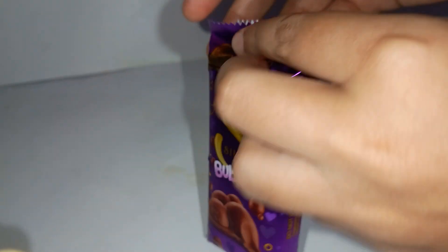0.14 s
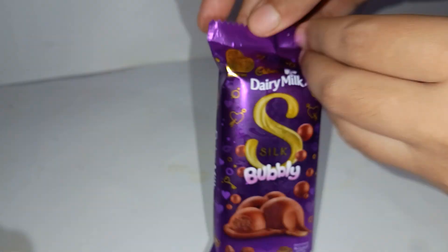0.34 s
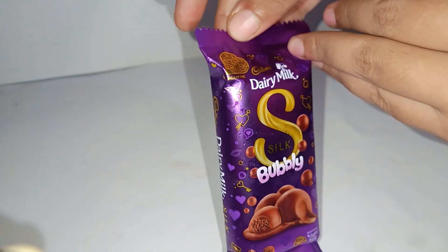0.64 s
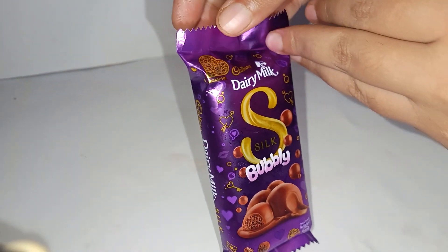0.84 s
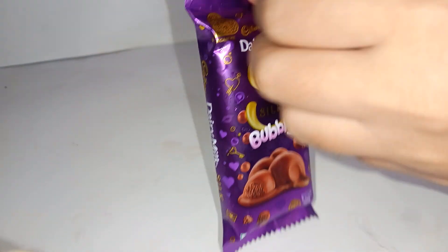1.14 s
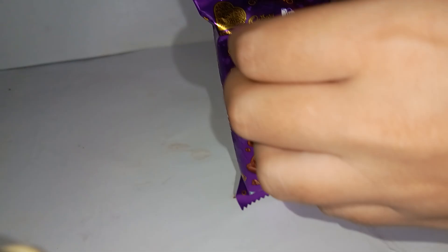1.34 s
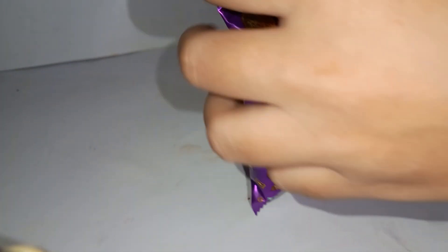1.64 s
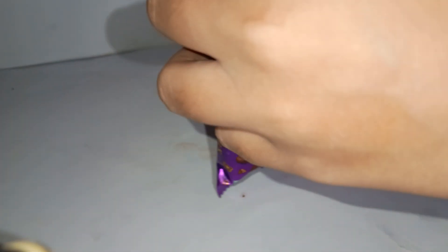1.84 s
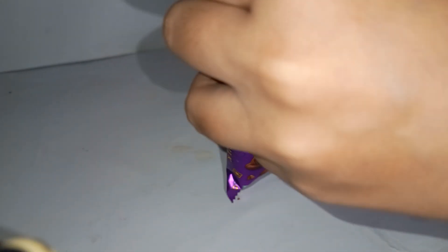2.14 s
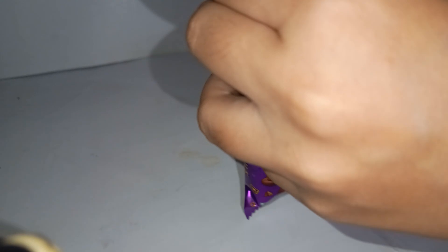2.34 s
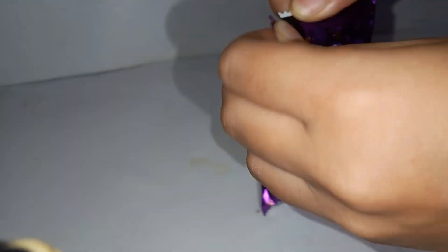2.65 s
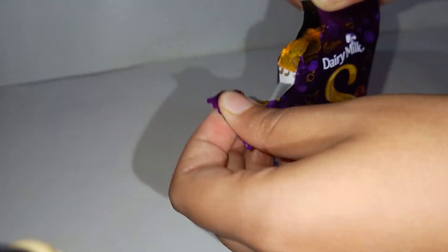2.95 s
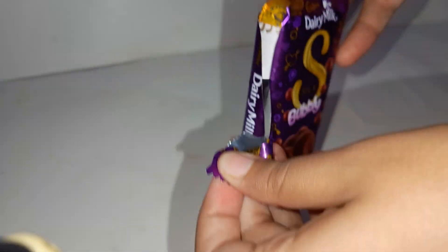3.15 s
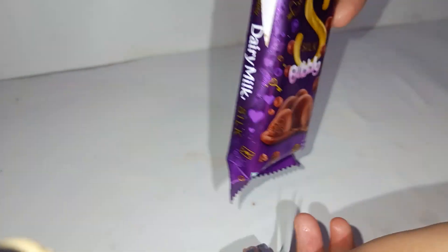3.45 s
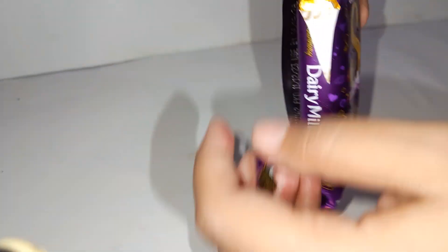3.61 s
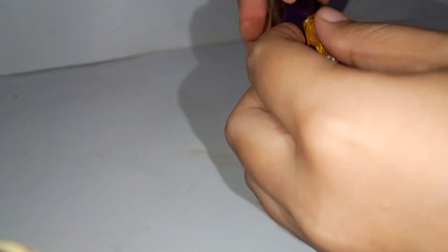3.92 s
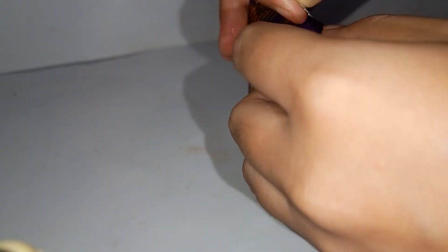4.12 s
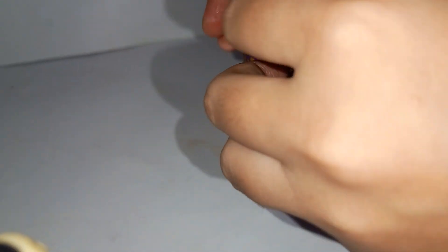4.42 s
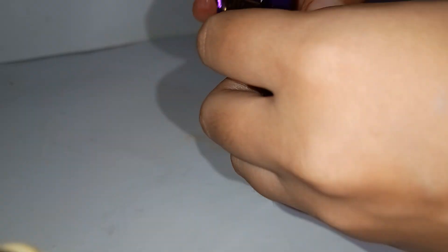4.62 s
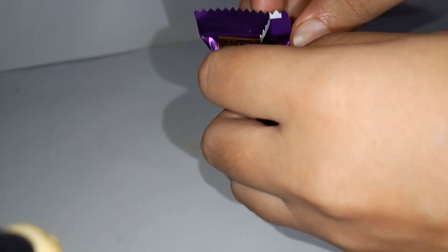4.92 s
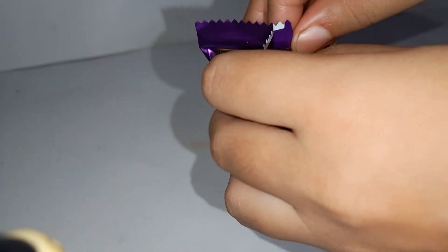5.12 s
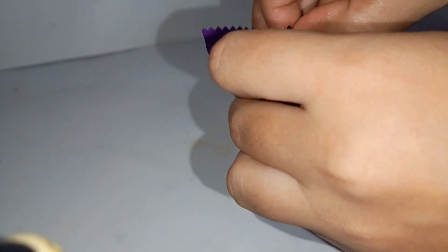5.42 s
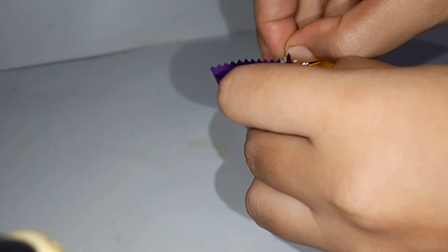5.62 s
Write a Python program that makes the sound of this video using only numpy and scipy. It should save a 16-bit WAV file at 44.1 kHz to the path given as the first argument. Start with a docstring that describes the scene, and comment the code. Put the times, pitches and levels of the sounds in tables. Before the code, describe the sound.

Very close stereo sound of hands opening a chocolate bar wrapped in plastic and foil on a table, in a small room with short dull echoes. A crackling burst with rustle comes at 0.15-0.5 s, with soft bumps near 0.2 s and a hard snap at 0.45 s. After a quieter gap, sharp cracks fall around 1.0 and 1.3 s, then dull knocks at 1.4-1.5 s. From about 2.1 to 2.9 s the tearing is dense: many dry snaps in quick clusters, with a swelling rustle near 2.8 s. It thins out from 3.2 to 4 s into small ticks and light strokes, with a bright crack at 4.1 s. Crackling and faint bumps return at 4.5-4.85 s, a strong snap leaning left at 5.1 s, and a loud crisp rustle with snaps from 5.5 s to the end. Underneath lie a low wavering drone that briefly dips, soft rumble and faint steady hiss.

```python
"""At a table in a room, hands turn and tear a plastic and foil sweet wrapper close to a pair of microphone ports.
Creases of the film snap over: a sharp crack, then dying noise coloured by a ring; echoes of table and walls follow.
Sliding fingers rustle: random grains and friction noise through the resonances of the film.
The bar and knuckles bump the table, heard as its dull decaying modes.
Behind it lie a wavering drone, rumble through the room's modes and steady air hiss."""
import sys
import numpy as np
from scipy import signal
from scipy.fft import rfft, irfft
from scipy.io import wavfile

SR = 44100
rng = np.random.default_rng(int(sys.argv[2]) if len(sys.argv) > 2 else 0)


def dump(signal):
    """Clip the signal to [-1, 1] and save it as 16-bit WAV at the path in sys.argv[1]."""
    limited = np.clip(np.atleast_2d(signal).T, -1, 1)
    pcm = np.round(limited * 32767).astype(np.int16)
    wavfile.write(sys.argv[1], SR, pcm)


N = 254456  # samples


def from_db(db):
    """Decibels to an amplitude factor."""
    return 10 ** (np.asarray(db) / 20)


def rms_one(x):
    """Scale to an rms of 1, both ports together."""
    return x / np.sqrt(np.mean(x ** 2) + 1e-20)


def in_time(rows):
    """Join the rows by straight lines: one curve per column after the time."""
    time_s, *columns = np.transpose(rows)
    return [np.interp(np.arange(N) / SR, time_s, column) for column in columns]


def band(x, low_hz, high_hz):
    """Keep one band, with gentle edges."""
    return signal.sosfilt(signal.butter(2, [low_hz, high_hz], "band", fs=SR, output="sos"), x)


def resonance(x, hz, width_hz):
    """Two poles, gain about 1 on top."""
    r = np.exp(-np.pi * width_hz / SR)
    feedback = [1, -2 * r * np.cos(2 * np.pi * hz / SR), r * r]
    return signal.lfilter((1 - r * r) / 2 * np.array([1, 0, -1]), feedback, x)


def drift(rate_hz):
    """Slow random wander with an rms of 1."""
    r = np.exp(-2 * np.pi * rate_hz / SR)
    wander = signal.lfilter([1], [1, -2 * r, r * r], rng.standard_normal(N + SR))
    return rms_one(wander[SR:])


RIGHT_LAG = 7  # samples


def pair(noise, alike):
    """Left and right from two unrelated signals; the right port hears the shared part later."""
    alike = np.clip(alike, 0, 1)
    late = np.roll(noise[0], RIGHT_LAG)
    return np.array([noise[0], np.sqrt(alike) * late + np.sqrt(1 - alike) * noise[1]])


def treble_of(x, tilt_db):
    """The lower and upper treble, tipped against each other."""
    lower = band(band(x, 7650, 11200), 5200, 12000)
    upper = band(band(x, 11200, 22000), 12000, 16000)
    return (rms_one(lower) + from_db(tilt_db) * rms_one(upper)) / np.sqrt(1 + from_db(2 * tilt_db))


# creases snapping over: start_s, body_db, ring_hz, low_db (re body), treble_db (re body), pan_db (left re right)
SNAPS = [(0.1447, -27, 3700, -11.5, -6.5, 4), (0.224, -41, 4370, -21, -10, -1),
         (0.27, -38, 3500, -26, -7, 3), (0.351, -41, 2480, -12, -13, 6), (0.3651, -39.5, 6200, -14, -21, 2),
         (0.4451, -28, 5700, -48, -10.5, 19), (0.4503, -22, 4970, -17.5, -8, -2),
         (0.456, -25.5, 3960, -21, -9, 12.5), (0.4998, -51, 1570, -4, -19, 5),
         (0.5357, -38, 2940, -2, -24.5, 1), (0.8998, -43, 3880, -7.5, -11, 6.5),
         (0.9217, -41, 4675, -9, -6.5, 1), (0.9831, -36.5, 3837, -16, -4, 3),
         (1.0043, -24.5, 3660, -3.5, -3, 3.5), (1.0488, -42.5, 6750, -7, -3, 2.5),
         (1.2698, -28.5, 5440, -10.5, -11, 1), (1.287, -28, 6620, -27, -10, 2.5),
         (1.2994, -31, 3800, -15, -12, 3), (1.3247, -24.5, 7800, -15.5, 1.5, 1),
         (1.5054, -39.5, 1770, -4.5, -17, -3), (1.571, -40.5, 5288, -14, -19, -1),
         (1.6007, -34.5, 3570, -15, -10, 5), (1.641, -61, 4000, -8, 6.5, -4),
         (1.7524, -35, 1880, -18, -51, 4), (1.8116, -53, 2670, 0.5, -18, 7), (1.864, -56, 7184, -28, 12, 0),
         (1.9054, -32, 2330, -20.5, -10, 4.5), (2.08, -26, 2080, -18.5, -36, 0),
         (2.085, -26.5, 2130, -20, -7, 6.5), (2.096, -47, 2500, -21, -4, -10),
         (2.1579, -32, 4440, -21.5, -14, 1), (2.1858, -24, 3110, -20.5, -7.5, 1.5),
         (2.198, -30.5, 4736, -26, -18, -2), (2.213, -30, 2980, -21, 4, 3),
         (2.254, -25, 7060, -23.5, -9.5, -1.5), (2.266, -51, 4470, -12, -7, 2),
         (2.3134, -32.5, 2340, -8, -11, 3), (2.339, -33.5, 2100, -14.5, -4, -2),
         (2.4013, -35, 3830, -43, -7, 2.5), (2.4515, -35, 6250, -43, 9, -1),
         (2.4928, -41.5, 4130, -24, -30, 1), (2.5489, -62, 2095, -30, 9, 1),
         (2.5697, -30.5, 2960, -38, -37, 6), (2.6081, -26.5, 2920, -40, -6, 5),
         (2.671, -30, 3550, -12.5, -8, 10), (2.6835, -26.5, 6100, -28, 1, -1),
         (2.7243, -26.5, 3680, -25, -8, 1), (2.7744, -30, 6200, -47, -2, -3),
         (2.78, -40, 3980, -33, 3.5, 5), (2.7916, -40, 3330, -26, -35, 11),
         (2.8088, -35, 1806, -10.5, -20, 0), (2.831, -30, 4200, -19, -5, 0),
         (2.8364, -28, 5700, -17, -8, 3), (2.854, -27, 3470, -22, -11, 1),
         (2.857, -25.5, 3240, -36, -28, 10.5), (2.8632, -31.5, 3900, -27, -4, 0),
         (2.9571, -36, 4290, -22.5, -0.5, 3.5), (3.019, -45, 4030, -29, -30, 4),
         (3.096, -30, 3265, -7.5, -8, 4.5), (3.1896, -45, 3622, -17, -26.5, 6),
         (3.3092, -35, 3920, -5.5, -8, -0.5), (3.3537, -48, 3180, -7, -7, 7.5),
         (3.542, -60, 6500, -25, -1.5, 1.5), (3.6086, -38, 4370, -39.5, -25, 7.5),
         (3.64, -59, 2663, -16, 4.5, 13), (3.6715, -46, 3770, -41, -7.5, 9.5),
         (3.7012, -42.5, 4335, -46, -9, 4), (3.7965, -43, 3380, -26, -8, 2), (3.873, -35, 6590, -13, -6, 3),
         (3.8745, -33, 3511, -11.5, -7, 2.5), (3.9145, -43.5, 6400, -28, 1, -2),
         (4.045, -57, 4670, -6, 10, 7), (4.078, -47.5, 2910, -26, -23, -2),
         (4.111, -28.5, 6800, -11.5, -1, 0.5), (4.325, -56, 5450, -25, -7, 2),
         (4.485, -40, 4550, -31, -1, 2), (4.4927, -41.5, 3990, -33, -14, -1),
         (4.5341, -31, 3630, -42, -5.5, 1.5), (4.549, -39, 4380, -42, -12, -3),
         (4.629, -41.5, 6700, -17, -14, 0), (4.6541, -38.5, 2468, -25, -6, -2),
         (4.658, -33.5, 6400, -20, -10, 3), (4.6651, -31, 6740, -21.5, -7.5, 3),
         (4.6908, -32.5, 3322, -8.5, -6.5, 3), (4.7154, -31.5, 3000, -11.5, -15, 4),
         (4.8072, -29, 1990, -18, -18, 2), (4.836, -27, 5582, -18, -12.5, 5.5),
         (4.932, -54, 6100, -28, -16, 8), (4.9723, -56, 1620, 8, -31, 11.5),
         (5.0785, -48, 7100, -25, -1.5, -0.5), (5.1171, -22, 2520, -32, -12.5, 12.5),
         (5.127, -39.5, 2480, -12, 1.5, -12), (5.1364, -34, 3920, -32, -12, 8),
         (5.146, -30.5, 3810, -26, -9, 1), (5.21, -30.5, 2485, -29, -21, 5),
         (5.215, -27.5, 3420, -37, -14, 2), (5.2704, -40.5, 3640, -24, -9, 11),
         (5.275, -39, 4000, -28, -6, 2), (5.287, -35, 3833, -33, -12, 3), (5.438, -25, 5760, -31, -5, 3.5),
         (5.4892, -37, 3125, -12.5, -3, 2), (5.499, -42, 5284, -5, -19, 8), (5.589, -44, 4030, -35, 4, 1),
         (5.6109, -47, 2800, -9, -14, 8), (5.64, -35, 6970, -14, -6, 3), (5.659, -29, 3715, -27, 2, 6),
         (5.6731, -24, 4900, -30, -15, 2), (5.6976, -26.5, 4080, -13, -3.5, 1)]
# slow change of colour as the foil is bared: time_s, tilt_db (upper re lower treble),
# then levels at the usual effort: fine_folds_db, sizzle_db, dull_rub_db
FOIL_BARED = [(0, -4, -66.5, -70.5, -61.5), (.6, -11, -66, -77, -61.5), (1.0, -12.5, -62, -69, -61.5),
              (1.6, -10.5, -57, -70, -60.5), (2.0, -16, -61.5, -68, -61.5), (2.4, 2, -64.5, -72, -67.5),
              (3.2, -4, -63.5, -68, -67), (4.0, 3.5, -60.5, -70, -69), (4.5, -9, -66, -75.5, -64),
              (5.0, -0.5, -67, -85, -60.5), (5.4, -2, -66, -73, -65), (5.77, 0, -58.5, -68, -63)]
# dull modes of the wrapped bar: pitch_hz
BAR_MODES = [645, 860, 1210]
FLIP_S, CRACK_T60_S = 0.00043, 0.005  # onset time constant; decay of the crack
SHIVER_T60_S, SHIVER_SPREAD_DB = 0.025, 3.5  # typical decay of the body; its spread from snap to snap
LOW_LIFE = 1.5  # decay of the low part, as a share of the body's
RING_Q, TILT_SPREAD_DB = 4.7, 6.5
CRACK_GROWS, USUAL_SNAP_DB = 0.3, -32.5  # harder snaps crack more sharply: dB of crack per dB over the usual


def first_ms_to_one(x):
    """Scale each port to an rms of 1 over the first 4 ms of a snap."""
    first = np.arange(x.shape[1]) / SR < .004
    return x / np.sqrt(np.mean(x[:, first] ** 2, axis=1, keepdims=True))


def snaps(rows, alike, crack_db, ring_share):
    """A crease flips in a sharp crack, then the film shivers out: dying noise in a ring, a low part and treble."""
    t = np.arange(3000) / SR
    out = np.zeros((2, N + len(t)))
    share = np.clip(ring_share, 0, 1)
    noises = rng.standard_normal((len(rows), 2, len(t))) * (1 - np.exp(-t / FLIP_S))
    luck = rng.random((len(rows), 4))  # echo delay, then the strengths of the bar's modes
    spreads = rng.standard_normal((len(rows), 2))
    tilt_db = in_time(FOIL_BARED)[0]
    for noise, (far, *strengths), (longer, brighter), row in zip(noises, luck, spreads, rows):
        start_s, body_db, ring_hz, low_db, treble_db, pan_db = row
        at = round(start_s * SR)
        t60 = SHIVER_T60_S * from_db(SHIVER_SPREAD_DB * longer)
        sharpness_db = crack_db + CRACK_GROWS * (body_db - USUAL_SNAP_DB)

        def crack_and_shiver(life=1, edge_db=0):
            shiver = from_db(-60 * t / (life * t60))
            crack = from_db(sharpness_db + edge_db - 60 * t / CRACK_T60_S)
            return (shiver + crack) * noise

        body = band(band(crack_and_shiver(), 2070, 6650), 1500, 7140)
        ring = resonance(body, ring_hz, ring_hz / RING_Q)
        body = first_ms_to_one(share * first_ms_to_one(ring) + (1 - share) * first_ms_to_one(body))

        low = band(band(crack_and_shiver(LOW_LIFE), 580, 1600), 410, 2100)
        bar = sum(strength * resonance(low, hz, 89) for strength, hz in zip(strengths, BAR_MODES))
        low = first_ms_to_one(low + 1.3 * bar)

        treble = treble_of(crack_and_shiver(edge_db=-0.5), tilt_db[at] + TILT_SPREAD_DB * brighter)
        treble = first_ms_to_one(treble)

        sound = pair(body + from_db(low_db) * low + from_db(treble_db) * treble, alike)
        echo_delay = round((0.0006 + .0015 * far) * SR)
        sound = sound + .22 * np.roll(sound, echo_delay, axis=1)  # off the table top
        port_db = body_db + np.array([[pan_db / 2], [-pan_db / 2]])
        out[:, at:at + len(t)] += from_db(port_db) * sound
    return out[:, :N]


TICKS_PER_S, TICK_DB = 12, -53.5  # small creases at random: rate and body level at the usual effort
RATE_FOLLOWS, LEVEL_FOLLOWS = .6, 0.72  # dB of rate factor and of level per dB of effort
TICK_SPREAD_DB = 3.5


def ticks(effort_db):
    """Rows of small snaps, more and louder as the fingers work harder, each with a colour of its own."""
    chance = TICKS_PER_S * from_db(RATE_FOLLOWS * effort_db) / SR
    at = np.flatnonzero(rng.random(N) < chance)
    size, pitch, low, treble, pan = rng.standard_normal((len(at), 5)).T
    body_db = TICK_DB + LEVEL_FOLLOWS * effort_db[at] + TICK_SPREAD_DB * size
    ring_hz = np.clip(3800 * 1.4 ** pitch, 1500, 7500)
    return list(zip(at / SR, body_db, ring_hz, -18 + 9 * low, -15 + 7 * treble, 3 + 5 * pan))


# fingers working the film, stroke by stroke: start_s, length_s, first_db, last_db (effort, usual is USUAL_DB)
STROKES = [(0, .01, -58, -64.5), (.03, .09, -74, -71), (0.157, 0.34, -49.5, -48.5),
           (0.596, 0.026, -64, -63.5), (0.871, 0.04, -59, -52), (1.02, .07, -59, -65),
           (1.14, 0.013, -58, -56.5), (1.205, .17, -56.5, -56.5), (1.455, 0.062, -60, -60.5),
           (1.553, 0.13, -63, -63.5), (1.749, 0.056, -68, -75), (1.912, 0.064, -55, -65.5),
           (2.096, 0.073, -56.5, -56.5), (2.247, 0.13, -58, -59.5), (2.427, 0.069, -68, -64.5),
           (2.578, 0.058, -69, -61), (2.668, 0.21, -58.5, -46.5), (2.93, .11, -61, -66),
           (3.056, 0.12, -54.5, -65), (3.184, 0.17, -60.5, -62), (3.556, 0.016, -69.5, -73.5),
           (3.65, 0.058, -54.5, -63), (3.815, 0.016, -55, -64), (3.873, 0.079, -56.5, -61),
           (4.06, 0.068, -64.5, -53.5), (4.173, .1, -55.5, -66.5), (4.304, 0.0061, -62, -53.5),
           (4.424, 0.066, -66, -55), (4.512, 0.085, -59.5, -54), (4.655, 0.16, -44, -65.5),
           (4.81, 0.057, -53, -54.5), (4.92, 0.13, -64.5, -71), (5.035, 0.18, -61, -55.5),
           (5.26, 0.11, -55.5, -70.5), (5.484, 0.29, -42, -58)]
RISE_DB_PER_S, FALL_DB_PER_S = 354, 261
REST_DB, USUAL_DB = -83, -60


def effort():
    """Each stroke rises fast, drifts from its first level to its last and dies away; dB re the usual."""
    t = np.arange(N) / SR
    out = np.full(N, float(REST_DB))
    for start_s, length_s, first_db, last_db in STROKES:
        end_s = start_s + length_s
        held = np.interp(t, [start_s, end_s], [first_db, last_db])
        rise = RISE_DB_PER_S * np.maximum(start_s - t, 0)
        fall = FALL_DB_PER_S * np.maximum(t - end_s, 0)
        out = np.maximum(out, held - rise - fall)
    return out - USUAL_DB


def crackle(per_s, spread_db, grain_t60, grain_share):
    """Countless tiny creases, in clumps, each shivering briefly, over the friction noise of the skin."""
    born = rng.random(N) < per_s * from_db(5 * drift(25)) / SR
    sizes = born * from_db(spread_db * np.minimum(rng.exponential(1, N), 4))
    grains = signal.lfilter([1], [1, -from_db(-60 / (grain_t60 * SR))], sizes)
    share = np.clip(grain_share, 0, 1)
    return rng.standard_normal((2, N)) * (share * rms_one(grains) + 1 - share)


def folds(drive, modes, patchy_db):
    """Each resonance of the film has creases of its own too, and comes and goes as the folds shift."""
    out = 0
    for hz, width_hz, db in modes:
        own = crackle(per_s=90, spread_db=4.0, grain_t60=0.075, grain_share=0.6)
        gain = from_db(db + patchy_db * drift(9))
        out = out + gain * resonance(resonance(drive + 3.3 * own, hz, width_hz), hz, 2 * width_hz)
    return rms_one(out)


# resonances of the film, each table: pitch_hz, width_hz (of the first of two filters), level_db (relative)
BROAD_FOLDS = [(2040, 310, 0), (2400, 340, 1)]
MIDDLE_FOLDS = [(3200, 1200, 0), (4320, 1300, 0.0047)]
FINE_FOLDS = [(5740, 1100, 0.5), (6500, 900, 0.22)]
# dB of level per dB of effort: fine folds, sizzle, dull rub
FOLLOWS = [1.22, 1.4, 0.69]
BROAD_DB, BROAD_FOLLOWS = -64.5, 1  # level at the usual effort; dB per dB of effort
MIDDLE_DB, MIDDLE_FOLLOWS = -59, 0.93


def rustle(effort_db, alike):
    """The film under moving fingers; the foil adds sharper, brighter grains."""
    broad_db = BROAD_DB + BROAD_FOLLOWS * effort_db
    middle_db = MIDDLE_DB + MIDDLE_FOLLOWS * effort_db
    tilt_db, *usual = in_time(FOIL_BARED)
    fine_db, sizzle_db, rub_db = (db + follows * effort_db for db, follows in zip(usual, FOLLOWS))

    film = crackle(per_s=250, spread_db=-2.0, grain_t60=0.022, grain_share=0.79)
    foil = crackle(per_s=240, spread_db=15.0, grain_t60=.006, grain_share=0.3)

    broad = from_db(broad_db) * folds(film, BROAD_FOLDS, patchy_db=1.0)
    middle = from_db(middle_db) * folds(film, MIDDLE_FOLDS, patchy_db=0.0)
    fine = from_db(fine_db) * folds(film, FINE_FOLDS, patchy_db=2.5)
    sizzle = from_db(sizzle_db) * treble_of(0.3 * film + foil, tilt_db)
    dull_rub = from_db(rub_db) * rms_one(band(band(film, 460, 2100), 500, 2700))
    parts = broad + middle + fine + sizzle + dull_rub
    return pair(parts, alike) * from_db([[1.1], [-1.1]])  # a little stronger on the left


# bar and knuckles on the table: start_s, level_db, pitch_hz (favoured), loss_db (per octave away from it)
BUMPS = [(0.183, -39.5, 380, 30), (0.194, -42.5, 318, 32), (1.401, -48.5, 360, 34), (1.506, -38.5, 650, 25),
         (1.512, -37.5, 200, 12), (1.535, -42, 347, 25), (4.694, -48, 276, 30), (4.806, -39.5, 650, 30)]
# dull modes of the table: pitch_hz, t60_s
TABLE_MODES = [(155, 0.13), (238, 0.15), (280, 0.14), (322, .08), (365, 0.063), (648, 0.077)]


def bumps():
    """Soft contacts set the dull modes of the table ringing, most those near the pitch that the spot favours."""
    t = np.arange(9000) / SR
    out = np.zeros(N + len(t))
    soft_onset = 1 - np.exp(-t / 0.0012)
    for start_s, level_db, favoured_hz, loss_db in BUMPS:
        at = round(start_s * SR)
        for hz, t60 in TABLE_MODES:
            mode_db = level_db - loss_db * abs(np.log2(hz / favoured_hz))
            out[at:at + len(t)] += from_db(mode_db - 60 * t / t60) * soft_onset * np.sin(2 * np.pi * hz * t)
    return out[:N]


ROOM_T60_S, ROOM_DB = 0.13, -15.5


def room(x):
    """Dense echoes of table and walls, dull and short, other ones at each port."""
    t = np.arange(round(.3 * SR)) / SR
    decay = from_db(-60 * t / ROOM_T60_S) * (t > .003)
    echoes = band(rng.standard_normal((2, len(t))) * decay, 360, 12200)
    echoes /= np.sqrt(np.sum(echoes ** 2, axis=1, keepdims=True))
    return from_db(ROOM_DB) * signal.fftconvolve(x, echoes, axes=1)[:, :N]


# room modes that the rumble excites: pitch_hz, width_hz (of the first of two filters), level_db (usual)
ROOM_MODES = [(107.8, 15.6, -56.5), (131.7, 12, -61.5), (171.2, 27.4, -63), (208, 80, -67), (268, 35, -73),
              (352, 36, -88), (408, 14, -74.5), (620, 53, -81), (914, 45, -84.5)]
# swell of the low rumble: time_s, level_db (re usual)
RUMBLE = [(0, -11), (.22, 1.5), (.35, 0), (1.43, -1.5), (1.53, 5), (1.74, -5.5), (1.98, 0.5), (2.6, -2),
          (3.6, 0.5), (5.3, 3.5), (5.77, 2)]
# brief dips of the drone: centre_s, depth_db
DRONE_DIPS = [(.86, 8), (1.55, 9), (1.72, 26), (2.88, 14), (3.0, 5), (3.59, 27.5), (4.29, 13), (4.93, 13.5),
              (5.58, 8)]
DRONE_HZ, DRONE_DB, DIP_S = 66.7, -61.5, 0.053  # mean pitch; rms level between dips; dip's Gaussian width
WANDER_DB = 1.5  # each room mode swells on its own too


def hum(side_db):
    """A wavering drone, and far rumble through the room's modes; nearly alike at both ports."""
    t = np.arange(N) / SR
    rumble_db = in_time(RUMBLE)[0]
    dips_db = sum(depth_db * np.exp(-.5 * ((t - s) / DIP_S) ** 2) for s, depth_db in DRONE_DIPS)
    drone_phase = 2 * np.pi * np.cumsum(DRONE_HZ + 1.1 * drift(2.8)) / SR
    out = np.sqrt(2) * from_db(DRONE_DB - dips_db) * np.sin(drone_phase)
    for hz, width_hz, db in ROOM_MODES:
        noise = rng.standard_normal((2, N))
        mid, side = resonance(resonance(noise, hz, width_hz), hz, 2 * width_hz)
        gain = from_db(db + rumble_db * (hz < 300) + WANDER_DB * drift(1.7))  # the low modes swell together
        # the ports differ more at higher modes
        difference = from_db(side_db) * hz / 100 * rms_one(side) * np.array([[1], [-1]])
        out = out + gain * (rms_one(mid) + difference)
    return out * from_db([[-1.2], [1.2]])  # a little stronger on the right


# colour of the air noise: pitch_hz, level_db (relative, per Hz)
HISS_COLOUR = [(30, -7.5), (60, -22.5), (300, -5), (500, -29.5), (1300, -39.5), (2500, -28), (6000, -43.5),
               (9000, -41.5), (16000, -53)]
HISS_DB = -67.5  # rms


def hiss():
    """Broad steady air noise, unrelated in the two ports."""
    hz = np.maximum(np.fft.rfftfreq(N, 1 / SR), 20)
    colour_hz, colour_db = np.transpose(HISS_COLOUR)
    colour = from_db(np.interp(np.log(hz), np.log(colour_hz), colour_db))
    return from_db(HISS_DB) * rms_one(irfft(rfft(rng.standard_normal((2, N))) * colour, N))


def scene():
    """Snaps with their echoes, rustle and bumps, over hum and hiss."""
    effort_db = effort()
    cracks = snaps(SNAPS + ticks(effort_db), alike=0.11, crack_db=6.5, ring_share=0.57)
    echoes = room(cracks)
    film = rustle(effort_db, alike=0.1)
    return cracks + echoes + film + bumps() + hum(side_db=-16.5) + hiss()


def record(dry):
    """The top is cut by two steep low-pass filters in a row."""
    soft = signal.sosfilt(signal.butter(10, 16100, fs=SR, output="sos"), dry)
    return signal.sosfilt(signal.cheby2(14, 70, 17100, fs=SR, output="sos"), soft)


dry = scene()
out = record(dry)
dump(out)
```